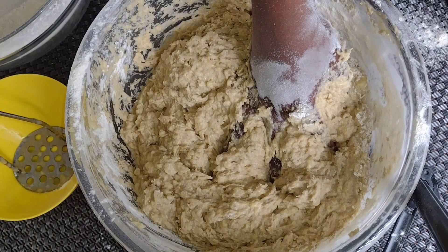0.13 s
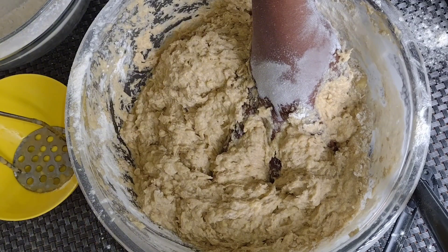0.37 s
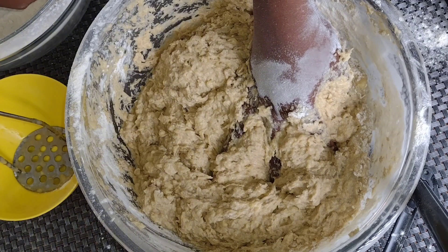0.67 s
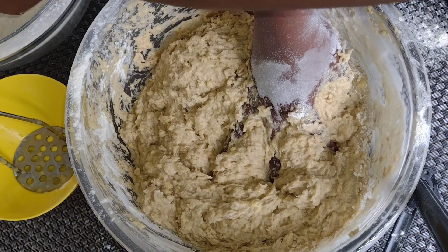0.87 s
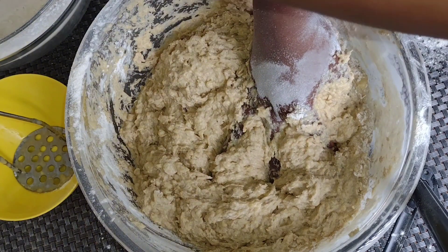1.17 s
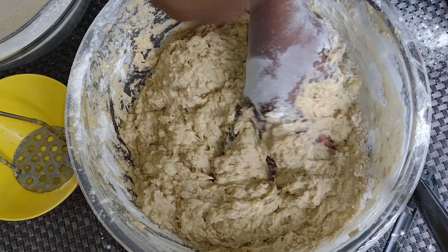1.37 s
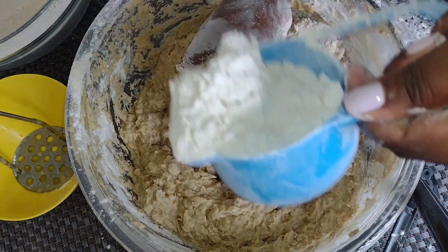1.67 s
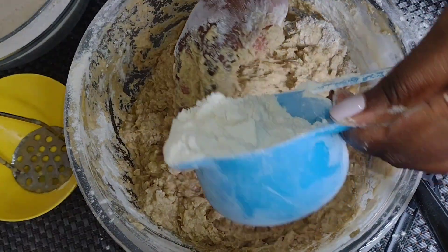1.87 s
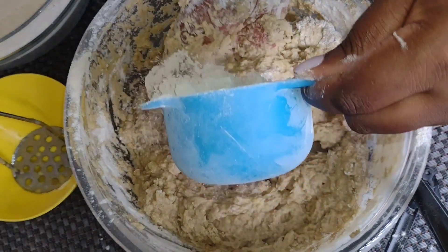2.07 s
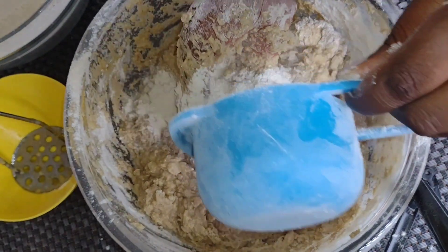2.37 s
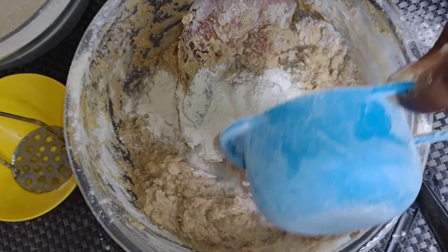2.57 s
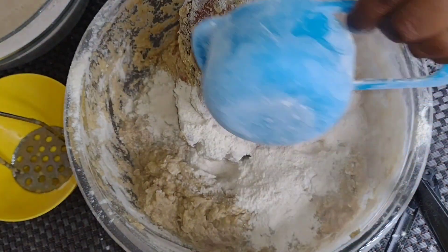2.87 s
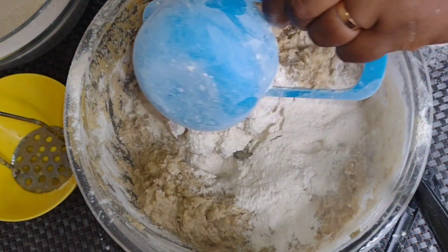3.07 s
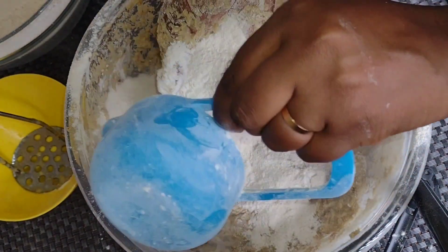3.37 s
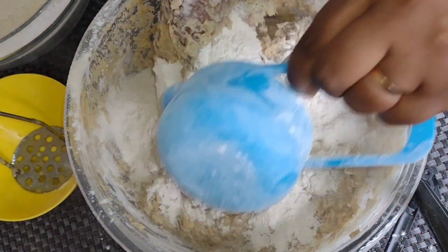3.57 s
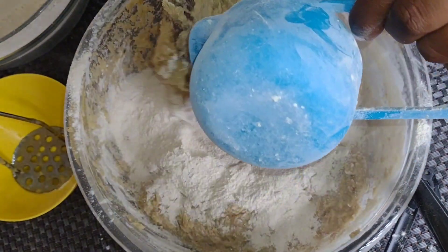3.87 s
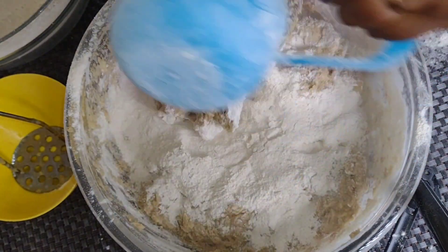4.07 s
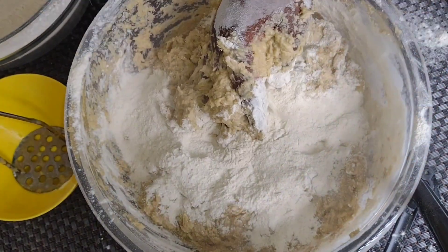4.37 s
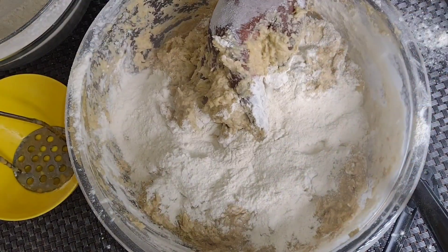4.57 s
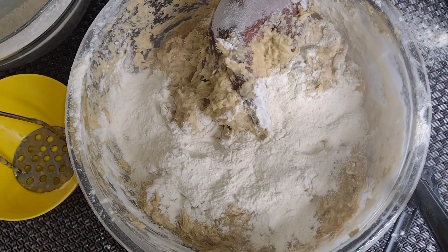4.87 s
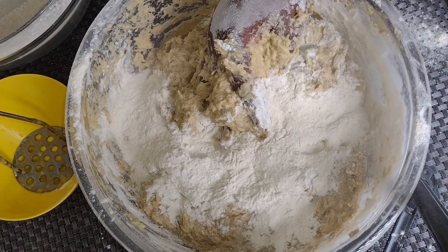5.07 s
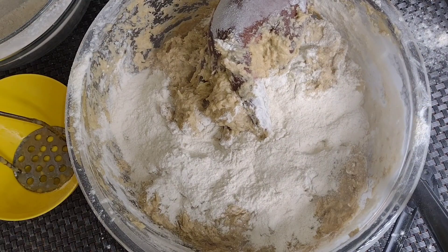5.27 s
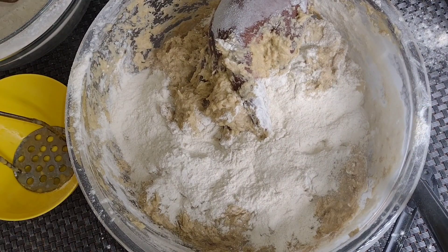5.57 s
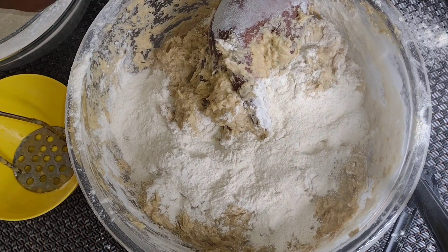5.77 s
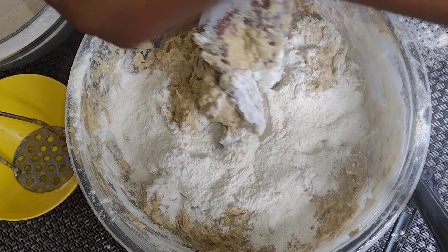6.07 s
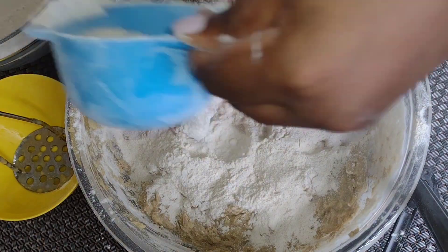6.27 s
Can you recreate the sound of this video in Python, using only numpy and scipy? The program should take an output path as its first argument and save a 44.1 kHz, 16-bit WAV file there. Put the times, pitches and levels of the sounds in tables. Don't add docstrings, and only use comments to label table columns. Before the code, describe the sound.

Dough snaps softly and a scoop of flour scrapes a ringing bowl over low traffic hum, then bright overlapping bird trills take over.

```python
import sys
import numpy as np
from scipy import signal
from scipy.io import wavfile
from scipy.ndimage import uniform_filter1d

SR = 44100
rng = np.random.default_rng(int(sys.argv[2]) if len(sys.argv) > 2 else 0)


def invert_db(x):
    u = np.asarray(x, float) / 20
    return 10 ** u


def file_out(sig):
    cols = np.atleast_2d(sig).T
    lim = np.clip(cols, -1, 1)
    pcm = np.round(lim * 32767).astype(np.int16)
    wavfile.write(sys.argv[1], SR, pcm)


N = 283122

# frequency in Hz, likeness from -1 to 1.
STEREO_LIKENESS = [(60, 1), (130, 1), (290, 0.66), (640, 0.47), (1410, -0.31), (3100, 0.05), (6820, -0.062),
                   (15000, -0.011)]
# frequency in Hz, level in dB per Hz.
AIR_COLOUR = [(452, -9), (687, -41), (768, -20.5), (1500, -33.5), (2690, -32), (3550, -37), (15500, -46)]

# time in seconds, level in dB.
TRAFFIC_LEVEL = [(0, -64.5), (.25, -60.5), (.68, -59), (1.29, -64), (1.6, -63.5), (1.9, -58), (2.15, -59),
                 (2.9, -61), (3.25, -61.5), (3.7, -62), (4.18, -55.5), (4.35, -57.5), (4.65, -58.5),
                 (4.85, -58.5), (5.8, -58), (6.0, -59), (6.24, -52), (6.42, -58.5)]
# frequency in Hz, width in Hz, level in dB.
BOOM_MODES = [(129.64, 17, 7.5), (141, 17, -33)]
# frequency in Hz, width in Hz, level in dB.
RUMBLE_MODES = [(174.6, 9.1, -16), (102.2, 16, -14.5), (70.2, 5.3, -6.5), (34.7, 62, -46)]
# frequency in Hz, width in Hz, level in dB.
ROAR_MODES = [(233, 13, -7.5), (276.2, 17.3, 4), (346, 47, 2), (403, 19, -2.5), (491, 60, -6.5),
              (676.6, 5.8, -3), (890, 12, -4.5)]
# frequency in Hz, level in dB per Hz.
ROAR_COLOUR = [(140, -52), (205, -0.5), (260, -3), (420, -6.5), (687, -3.5), (968, -14.5), (2000, -24),
               (2800, -54)]
# start in seconds, hold in seconds, level in dB.
THROBS = [(0, 0.04, -55), (.6, 0.22, -56.5), (1.45, 0.011, -59.5), (1.72, 0.014, -55.5),
          (1.9, 0.009, -53.5), (2.11, 0.012, -56), (2.47, 0.029, -68), (2.75, 0.025, -60),
          (3.18, 0.072, -55.5), (3.43, 0.069, -59), (4.02, 0.038, -52.5), (4.14, 0.064, -47.5),
          (4.56, 0.0086, -53), (4.88, 0.015, -51.5), (5.09, 0.053, -53.5), (5.2, 0.16, -54.5),
          (5.43, 0.017, -51), (5.68, 0.079, -53), (5.9, 0.015, -50.5), (6.01, 0.087, -45),
          (6.16, 0.082, -46), (6.32, 0.042, -53.5)]
# start in seconds, hold in seconds, level in dB.
THUDS = [
    (.18, 0.1, -61),
    (.71, .1, -67),
    (1.85, 0.083, -60),
    (2.27, 0.063, -57.5),
    (2.6, 0.037, -60.5),
    (3.43, .02, -65),
    (4.0, 0.34, -58.5),
    (4.63, 0.057, -64),
    (5.4, 0.28, -61),
    (6.22, 0.14, -59),
]

# start in seconds, length in seconds, first Hz, last Hz, level in dB.
FAR_LOW = [(0, 0.047, 2950, 3000, -102), (.08, 0.085, 2340, 2436, -94), (.085, 0.07, 2420, 2646, -89),
           (.26, 0.093, 2150, 2100, -97), (.28, 0.054, 1980, 2020, -101), (.75, 0.18, 2220, 2355, -93.5),
           (1.21, 0.14, 2250, 2394, -92), (1.65, 0.13, 2910, 3090, -88), (2.105, 0.122, 2956, 3050, -82.5),
           (2.59, 0.099, 2960, 3025, -82.5), (2.63, 0.1, 3070, 3165, -92), (3.18, .11, 2250, 2414, -87.5),
           (6.25, .16, 1830, 1823, -90.5)]
# start in seconds, length in seconds, first Hz, last Hz, level in dB.
FAR_HIGH = [(0, 0.017, 6640, 7140, -75.5), (.13, 0.047, 6680, 7100, -83.5), (.3, .04, 6600, 7160, -90),
            (.455, 0.053, 6400, 7060, -92), (.67, 0.032, 6900, 6870, -99), (.975, 0.02, 6830, 6900, -80.5),
            (.987, 0.027, 6680, 7850, -79.5), (1.09, 0.043, 6440, 6570, -99),
            (1.26, 0.077, 6250, 6750, -91.5), (1.275, 0.048, 6550, 7740, -86),
            (1.495, .09, 6400, 7380, -86.5), (1.54, 0.06, 7340, 8100, -93), (1.69, .06, 6460, 6960, -82.5),
            (1.915, 0.082, 7750, 8600, -96), (1.93, 0.073, 6500, 6980, -83.5),
            (2.27, 0.023, 6500, 6800, -87), (2.98, 0.077, 6250, 6390, -83.5)]

# start in seconds, hold in seconds, level in dB.
SCRAPES = [(1.36, 0.32, -74), (1.78, 0.04, -52), (1.9, 0.019, -62.5), (2.0, 0.16, -70.5),
           (2.16, 0.004, -68), (2.27, 0.0063, -60.5), (2.35, 0.55, -79.5), (3.24, 0.039, -92),
           (3.41, .005, -89), (3.91, .01, -76), (4.05, 0.046, -78), (4.18, 0.096, -67),
           (4.31, 0.097, -70.5), (4.55, 0.011, -66), (4.71, 0.0035, -63), (4.85, 0.12, -78),
           (5.2, 0.85, -76.5), (6.1, 0.042, -68.5), (6.18, 0.33, -74.5)]
# frequency in Hz, level in dB per Hz.
SCRAPE_COLOUR = [(500, -7), (593, -6), (1000, -11), (1260, -12.5), (3000, -9.5), (3460, -17), (6760, -22.5),
                 (15000, -58)]
# start in seconds, hold in seconds, level in dB.
RUBS = [
    (1.776, .003, -47.5),
    (1.855, 0.011, -55),
    (1.98, 0.011, -66),
    (2.148, .003, -60.5),
    (2.252, .003, -59),
]
# frequency in Hz, width in Hz, level in dB.
BOWL_MODES = [(774, 36, 28.5), (861, 37, 21.5), (970, 30, -18), (1140, 13, -23)]
# start in seconds, hold in seconds, rustle level in dB, sift level in dB.
SIFTS = [(.88, 0.022, -95, -95), (1.4, 0.12, -101, -94), (1.55, 0.16, -84, -88), (1.77, 0.014, -73.5, -81),
         (1.83, 0.17, -82, -94), (2.09, 0.056, -77.5, -94), (2.2, 0.35, -85, -100), (2.7, 0.095, -84, -99),
         (2.87, .02, -91, -95), (3.02, 0.15, -85.5, -90.5), (3.14, 0.3, -78, -92),
         (3.39, 0.06, -74.5, -103), (3.49, 0.35, -76.5, -95), (3.91, 0.08, -78.5, -92),
         (4.09, .02, -81, -92), (4.18, 0.24, -76.5, -93), (4.51, 0.075, -72.5, -93),
         (4.63, 0.017, -72.5, -85), (4.74, 0.018, -72.5, -84), (4.85, 0.022, -72.5, -86),
         (4.95, 0.057, -73, -84)]
# frequency in Hz, level in dB per Hz.
RUSTLE_COLOUR = [(1500, -11), (2500, -13), (4500, 6), (6500, 8), (8500, -0.5), (10000, -49)]
# frequency in Hz, level in dB per Hz.
SIFT_COLOUR = [(5000, -43), (8000, -4), (10000, -8), (12500, -10), (15500, -13)]
# start in seconds, length in seconds, centre in Hz, width in Hz,
# level in dB.
SCUFFS = [
    (0.883, 0.052, 2670, 400, -74),
    (1.99, 0.11, 2760, 1750, -63.5),
    (2.248, 0.033, 3200, 504, -61.5),
    (2.27, 0.15, 2500, 1200, -73),
    (2.387, 0.17, 4500, 1300, -74),
    (3.401, 0.013, 1490, 600, -67),
]
# time in seconds, peak level in dB.
TICKS = [(0.878, -71), (.9794, -78), (1.462, -67), (1.5426, -69), (1.551, -72), (1.562, -71), (1.588, -67),
         (1.598, -69), (1.609, -67), (1.6533, -59), (1.663, -67), (1.6796, -64), (1.696, -66), (1.708, -70),
         (1.7611, -77), (1.838, -69), (1.9187, -70), (1.9372, -69), (1.9836, -71), (2.136, -65),
         (2.158, -68), (2.2616, -73)]

# start in seconds, length in seconds, first Hz, last Hz, level in dB.
FIRST_LOWER = [(3.395, 0.096, 5410, 5600, -62), (3.56, 0.082, 5400, 6640, -56.5),
               (3.704, 0.093, 5430, 6990, -53), (3.863, 0.089, 5400, 6740, -52),
               (4.031, 0.081, 5400, 6680, -51.5), (4.165, 0.11, 5340, 6800, -52),
               (4.335, 0.095, 5450, 6810, -48.5), (4.515, 0.091, 5440, 6960, -47.5),
               (4.695, 0.072, 5440, 6750, -44.5), (4.86, 0.095, 5470, 7060, -42.5),
               (5.025, 0.085, 5450, 6300, -47), (5.195, 0.11, 5265, 6530, -40.5),
               (5.365, 0.095, 5250, 6930, -34), (5.572, 0.092, 5484, 6880, -36),
               (5.749, .11, 5290, 6660, -41.5), (5.945, 0.084, 5250, 6390, -44.5),
               (6.13, 0.086, 5350, 6880, -42), (6.335, 0.12, 5400, 6780, -44)]
# start in seconds, length in seconds, first Hz, last Hz, level in dB.
FIRST_UPPER = [
    (3.555, 0.057, 6400, 7550, -58),
    (3.725, 0.049, 6950, 7620, -58.5),
    (3.875, 0.058, 6750, 7700, -62),
    (4.03, 0.057, 6760, 7750, -59),
    (4.195, 0.064, 6600, 7560, -59),
    (4.36, 0.062, 6640, 7830, -59),
    (4.53, .09, 6900, 7800, -58.5),
               (4.8, .07, 7800, 7900, -56.5),
    (4.89, .08, 7450, 7800, -56),
    (5.375, 0.09, 6530, 8030, -39),
    (5.595, 0.062, 7120, 7920, -44.5),
    (5.75, 0.069, 6880, 7620, -41),
]
# start in seconds, length in seconds, first Hz, last Hz, level in dB.
SECOND_LOWER = [(4.69, 0.08, 6400, 7200, -49.5), (4.86, 0.097, 6060, 7420, -44),
                (5.045, .13, 5880, 7274, -38.5), (5.19, 0.11, 6620, 7230, -44.5),
                (5.255, 0.14, 6100, 7330, -37.5), (5.46, 0.13, 6030, 7254, -33.5),
                (5.675, .135, 5964, 7105, -36), (5.83, 0.0657, 6440, 7240, -40),
                (5.92, 0.15, 5910, 7330, -36), (6.145, 0.13, 6000, 7186, -40.5),
                (6.345, 0.12, 6100, 7500, -39)]
# start in seconds, length in seconds, first Hz, last Hz, level in dB.
SECOND_UPPER = [
    (4.703, 0.069, 7740, 8820, -61),
    (4.864, 0.095, 7850, 9200, -59),
    (5.029, .13, 7500, 9000, -53),
    (5.245, 0.13, 7520, 9230, -49.5),
    (5.453, 0.13, 7980, 9200, -46),
    (5.678, 0.13, 7650, 9190, -46.5),
    (5.886, 0.17, 7550, 9100, -51),
    (6.115, 0.13, 7500, 9090, -51.5),
    (6.338, 0.14, 7550, 9030, -52.5),
]


def evened(x):
    return x / np.sqrt(np.mean(x ** 2) + 1e-20)


def read(points, hz):
    f, value = np.transpose(points)
    return np.interp(np.log(hz + 1), np.log(f + 1), value)


def peaks(modes, hz):
    power = sum(invert_db(2 * db) / (1 + (2 * (hz - f) / width) ** 2) ** 2 for f, width, db in modes)
    return np.sqrt(power)


def smoothed_twice(x, size):
    return uniform_filter1d(uniform_filter1d(x, size=size), size=size)


def noise(shape, size=1024, patchy_db=0.0):
    frames, hz = 2 * N // size + 3, np.fft.rfftfreq(size, 1 / SR)
    a, b, c, d = rng.standard_normal((frames, len(hz), 4), dtype=np.float32).T
    patches = uniform_filter1d(uniform_filter1d(a[::-1], size=12, axis=0), size=6, axis=1)
    patches = evened(patches)
    same = np.clip(read(STEREO_LIKENESS, hz), -.98, .98)[:, None]
    left = a + 1j * b
    right = same * left + np.sqrt(1 - same ** 2) * (c + 1j * d)
    z = np.array([left, right]) * shape(hz)[:, None] * invert_db(patchy_db * patches)
    x = signal.istft(z, window="cosine", nperseg=size, noverlap=size // 2)[1][:, :N]
    return x / np.sqrt(np.mean(x.mean(0) ** 2))


def steadied(x, size=4000):
    return x / np.sqrt(smoothed_twice(x.mean(0) ** 2, size) + 0.027)


def flutter(size):
    return evened(smoothed_twice(rng.standard_normal(N + SR), size))


def strokes(rows, rise_db_s, fall_db_s, column=2):
    t, power = np.arange(0, N + 64, 64) / SR, 0
    for row in rows:
        start, hold = row[0], row[1]
        rise_db = rise_db_s * np.maximum(start - t, 0)
        fall_db = fall_db_s * np.maximum(t - start - hold, 0)
        power = power + invert_db(2 * (row[column] - rise_db - fall_db))
    return np.interp(np.arange(N) / SR, t, np.sqrt(power))


def grainy(per_s=900, spread_db=4.5, smooth=.5):
    slips = invert_db(spread_db * np.minimum(rng.exponential(1, N), 4))
    slips = slips * (rng.random(N) < per_s / SR)
    return evened(smooth + evened(signal.lfilter([1], [1, -.985], slips)))


def whistles(notes, bend=1.5, waver_hz=60, rough=.3, octave_db=-30, fade=.5, closer=.0, blur=.0):
    out = np.zeros((2, N + SR))
    waver, buzz = flutter(size=120), flutter(size=60) + 0.15 * flutter(size=10)
    best_hz, facing_s = 6050, 5.45
    for s, length, first_hz, last_hz, db in notes:
        haze = invert_db(min(-blur * (db + 49.0), 2))
        at, u = round(s * SR), np.linspace(0, 1, round(length * SR))
        span = slice(at, at + len(u))
        hz = first_hz + (last_hz - first_hz) * (1 - (1 - u) ** bend) + haze * waver_hz * waver[span]
        off_db = np.maximum(14 * (best_hz - hz), 5 * (hz - best_hz)) / 1000
        turn = 2 * np.pi * np.cumsum(hz) / SR
        swell = np.sin(np.pi * u ** 1.49) ** fade * (1 + haze * rough * buzz[span])
        octave = invert_db(octave_db + 0.46 * (db + 61.0) - off_db) * np.sin(2 * turn)
        note = invert_db(db) * swell * (np.sin(turn) + octave)
        direct = invert_db(-min(closer * abs(s - facing_s), 9))
        out[:, span] += note * np.array([[1], [direct]])
    return out[:, :N]


def yard(x, t60=.5, direct_db=(-9, -5), late_db=-12, late_t60=1.4, dulling=1.5):
    count = 26000
    taps = rng.standard_normal((2, count)) * (rng.random((2, count)) < .1) * (np.arange(count) > 180)
    hz, t, z = signal.stft(taps, SR, nperseg=128)
    age = t * np.maximum(hz[:, None] / 6500, .6) ** dulling
    decay = invert_db(-60 * age / t60) + invert_db(late_db - 60 * age / late_t60)
    tail = signal.istft(z * decay, SR, nperseg=128)[1]
    tail /= np.linalg.norm(tail, axis=1, keepdims=True)
    direct = np.array([np.roll(x[1], 19), x[1]]) * invert_db(np.array(direct_db))[:, None]
    return direct + signal.fftconvolve(x[:1], tail, axes=1)[:, :N]


def air():
    def colour(hz):
        return invert_db(read(AIR_COLOUR, hz)) * np.clip((hz - 500) / 700, 0, 1)

    return invert_db(-90.5 + 14.0) * noise(colour, patchy_db=1.3)


def traffic():
    def roar_colour(hz):
        return invert_db(read(ROAR_COLOUR, hz)) * (hz > 150) * (.5 + 1.3 * peaks(ROAR_MODES, hz))

    boom = steadied(noise(lambda hz: peaks(BOOM_MODES, hz), size=4096, patchy_db=8.0))
    rumble = steadied(noise(lambda hz: peaks(RUMBLE_MODES, hz), size=4096, patchy_db=3))
    roar = steadied(noise(roar_colour, size=4096, patchy_db=.3), size=5000)
    road_db = np.interp(np.arange(N) / SR, *np.transpose(TRAFFIC_LEVEL))
    throbs = strokes(THROBS, rise_db_s=101, fall_db_s=154)
    thuds = strokes(THUDS, rise_db_s=58, fall_db_s=51)
    deep = np.hypot(invert_db(-65 + 0.13 * (road_db - road_db.mean()) + 1.5), thuds)
    out = boom * np.hypot(invert_db(road_db - 2), throbs) * invert_db(1.8)
    out += rumble * deep * invert_db(-0.5)
    return out + roar * np.hypot(invert_db(road_db - 2.98), throbs * invert_db(-10.5))


def far_birds():
    high = whistles(FAR_HIGH, bend=1.3, waver_hz=40.3, rough=0.24, octave_db=-15, fade=0.18)
    low = whistles(FAR_LOW, bend=2.0, waver_hz=45, rough=.35, octave_db=-40, fade=.3)
    far = yard(high, t60=0.55, direct_db=(-5, -4), late_db=-26, late_t60=0.76, dulling=0.84)
    far += yard(low, t60=.75, direct_db=(-4, -4), late_db=-16, late_t60=.9, dulling=.0)
    return far * invert_db(19.0)


def scoop():
    scrape = noise(lambda hz: invert_db(read(SCRAPE_COLOUR, hz)) * (hz > 500), size=256)
    scrape *= grainy(per_s=1000, spread_db=13.0, smooth=3.0)
    ring = noise(lambda hz: peaks(BOWL_MODES, hz), size=2048)
    out = scrape * strokes(SCRAPES, rise_db_s=393, fall_db_s=187) * invert_db(-0.5)
    return out + ring * strokes(RUBS, rise_db_s=1000, fall_db_s=203) * invert_db(-3.0)


def paper_and_flour():
    rustle = noise(lambda hz: invert_db(read(RUSTLE_COLOUR, hz)), size=512, patchy_db=1.2)
    rustle *= grainy(per_s=400, spread_db=4.0, smooth=4.5)
    sift = noise(lambda hz: invert_db(read(SIFT_COLOUR, hz)), size=256)
    sift *= grainy(per_s=740, spread_db=5.0, smooth=2.1)
    rustle *= strokes(SIFTS, rise_db_s=406, fall_db_s=174)
    sift *= strokes(SIFTS, rise_db_s=406, fall_db_s=174, column=3)
    return rustle * invert_db(6.5) + sift * invert_db(9.0)


def scuffs():
    out = np.zeros((2, N))
    for s, length, hz, width, db in SCUFFS:
        at, count = round(s * SR), round(length * SR)
        band = signal.butter(2, [hz - width / 2, hz + width / 2], "band", fs=SR, output="sos")
        puff = evened(signal.sosfilt(band, rng.standard_normal((2, 8000))))[:, :count]
        swell = np.sin(np.pi * np.linspace(0, 1, count) ** 0.67)
        out[:, at:at + count] += invert_db(db) * puff * swell
    return out


def ticks():
    blows, t = np.zeros(N), np.arange(2000) / SR
    for s, db in TICKS:
        blows[round(s * SR)] = invert_db(db)
    decay = invert_db(-60 * t / 0.011) + invert_db(-22 - 60 * t / 0.065)
    shape = signal.oaconvolve(blows, decay)[:N]
    colour = [(1500, -8), (4000, -4.0), (12000, -9)]  # Hz, dB per Hz
    return invert_db(4.5) * shape * noise(lambda hz: invert_db(read(colour, hz)), size=256)


def near_birds():
    first = whistles(FIRST_LOWER, bend=1.15, waver_hz=90, rough=.35, octave_db=-39, fade=.35,
                     closer=16, blur=.25)
    second = whistles(SECOND_LOWER, bend=1.35, waver_hz=75, rough=.3, octave_db=-33, fade=.45,
                      closer=18, blur=.3)
    second += whistles(FIRST_UPPER + SECOND_UPPER, bend=1.45, waver_hz=68, rough=.3,
                       octave_db=-30, fade=.25, closer=11, blur=.35)
    first = yard(first, t60=0.53, direct_db=(-8, -2.5), late_db=-19, late_t60=.9, dulling=0.2)
    second = yard(second, t60=0.46, direct_db=(-7, -1.2), late_db=-13, late_t60=1.0, dulling=0.25)
    return first * invert_db(np.array([[2.5], [3.5]])) + second * invert_db(np.array([[1.5], [4.]]))


def scene():
    hand = scoop() + paper_and_flour() + scuffs() + ticks()
    return air() + traffic() + far_birds() + hand + near_birds()


def low_pass(x):
    return signal.sosfilt(signal.butter(12, 15690, fs=SR, output="sos"), x)


def record(dry):
    shift = 423
    hz, t, z = signal.stft(np.roll(dry, -shift, 1), SR, window="cosine", nperseg=2048, noverlap=1024)
    bands = (abs(z[:, :1024]) ** 2).reshape(2, 128, 8, -1).mean((0, 2))
    treble = (np.arange(128) > 54)[:, None]
    blended = np.where(treble, uniform_filter1d(bands, size=4, axis=0), bands)
    bands_db = 10 * np.log10(blended + 1e-20)
    loudest_db = uniform_filter1d(bands_db[8:].max(0), size=2)
    peak_db = loudest_db.max()
    quieter_db = np.maximum(peak_db - loudest_db, np.where(treble, 2, 8.5))
    margin_db = np.where(treble, 40.5, 33.5 + 4 * rng.standard_normal(bands.shape))
    margin_db[55:67] -= 8
    excess_db = bands_db - peak_db + margin_db + 2 * quieter_db
    z[:, :1024] *= np.repeat(excess_db > 0, 8, axis=0)
    masked = signal.istft(z, SR, window="cosine", nperseg=2048, noverlap=1024)[1][:, :N]
    return low_pass(np.roll(masked, shift, 1))


dry = scene()
out = record(dry)
file_out(out)
```